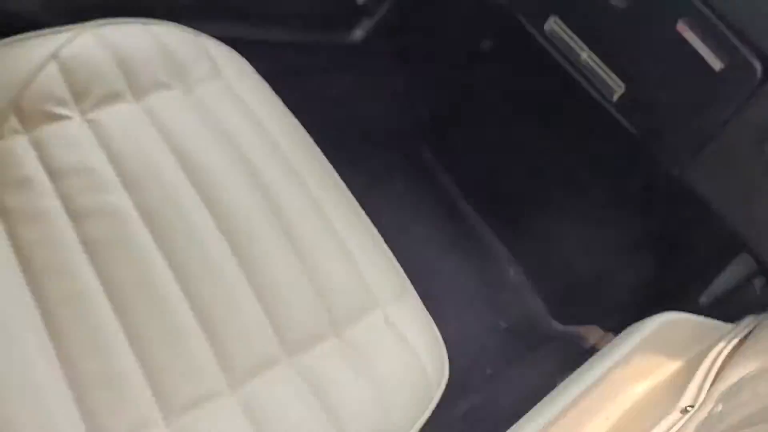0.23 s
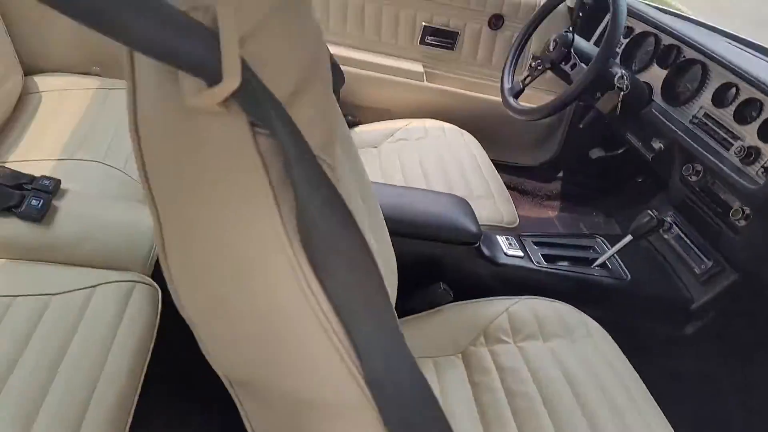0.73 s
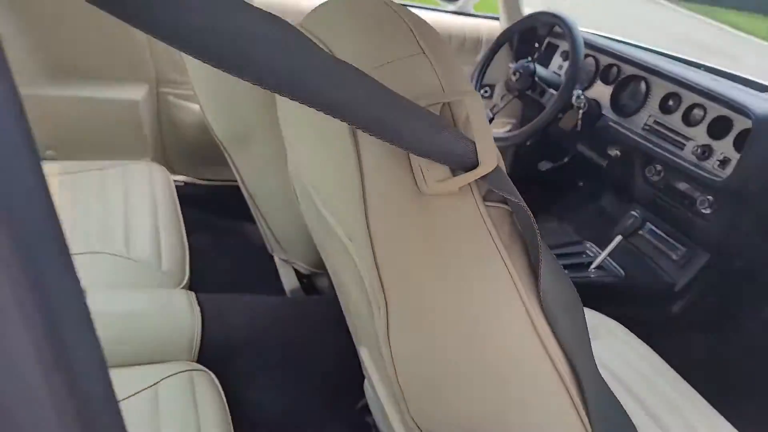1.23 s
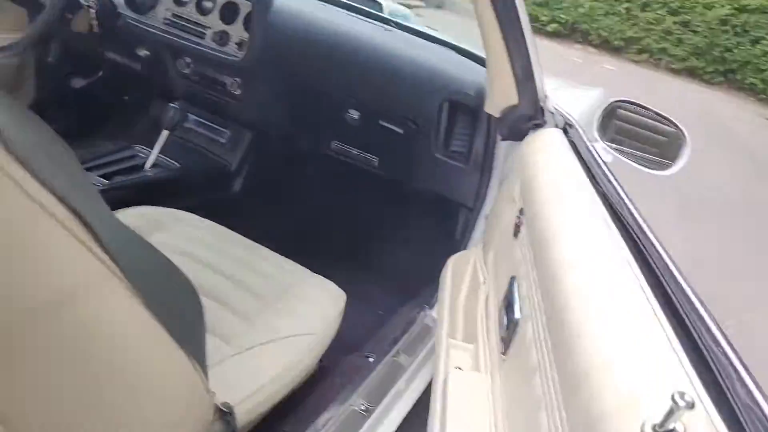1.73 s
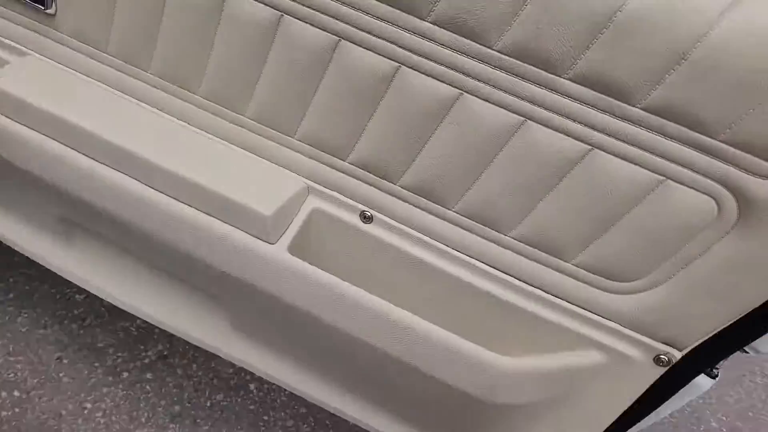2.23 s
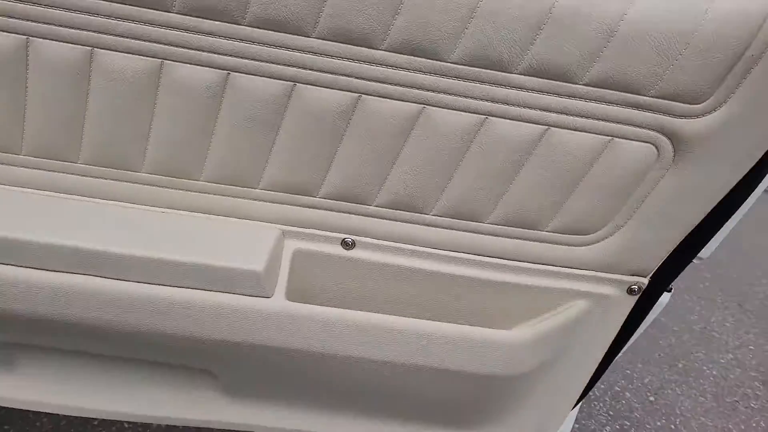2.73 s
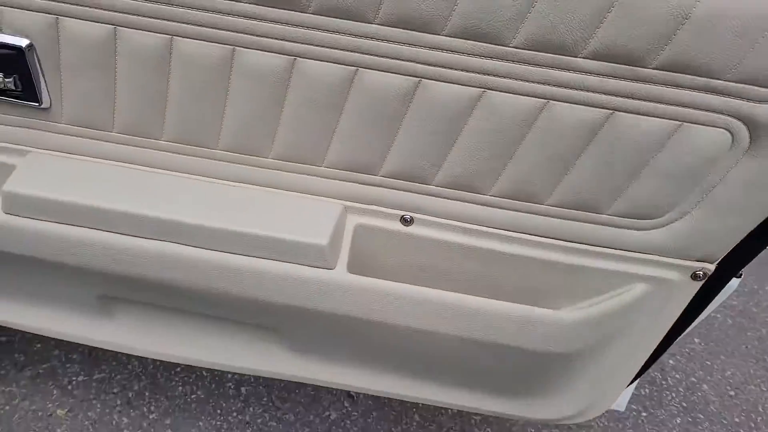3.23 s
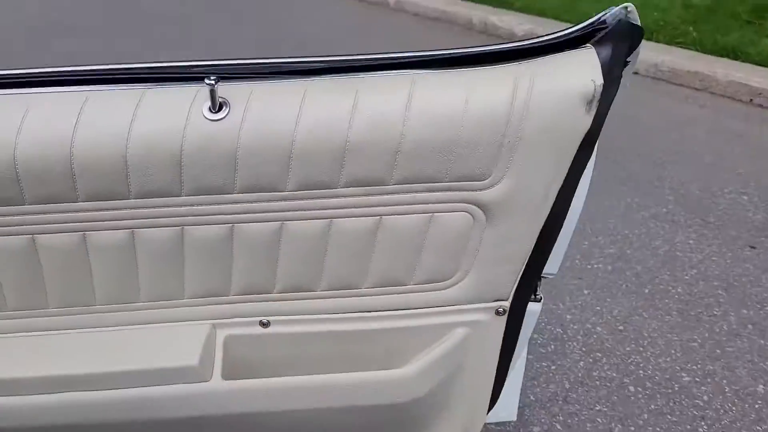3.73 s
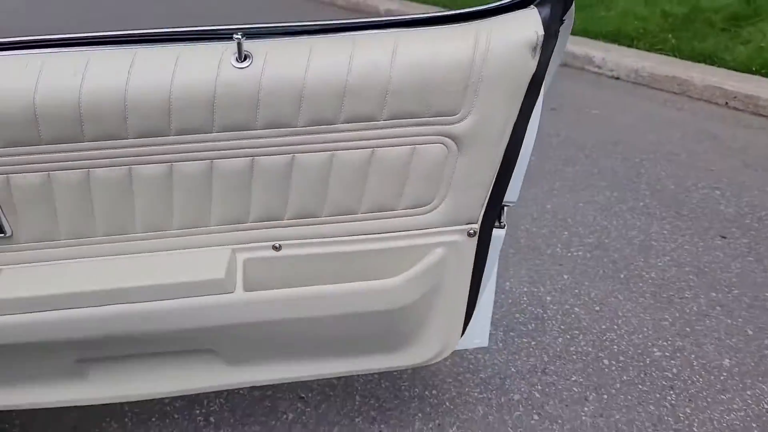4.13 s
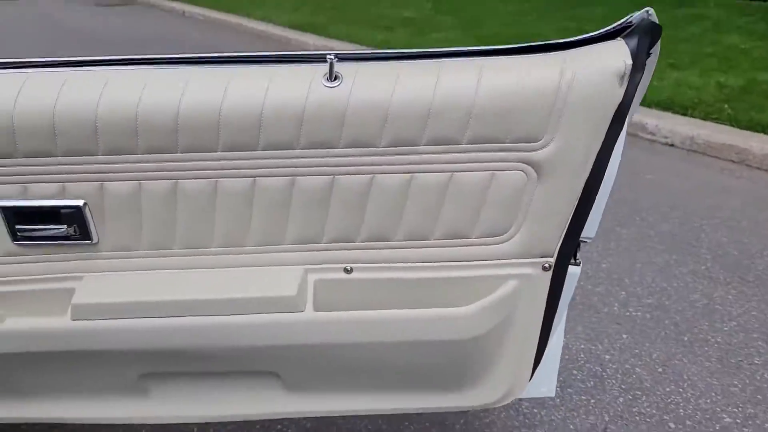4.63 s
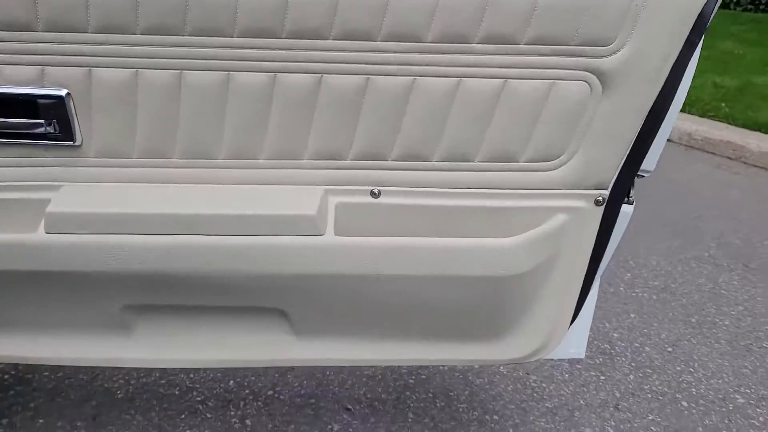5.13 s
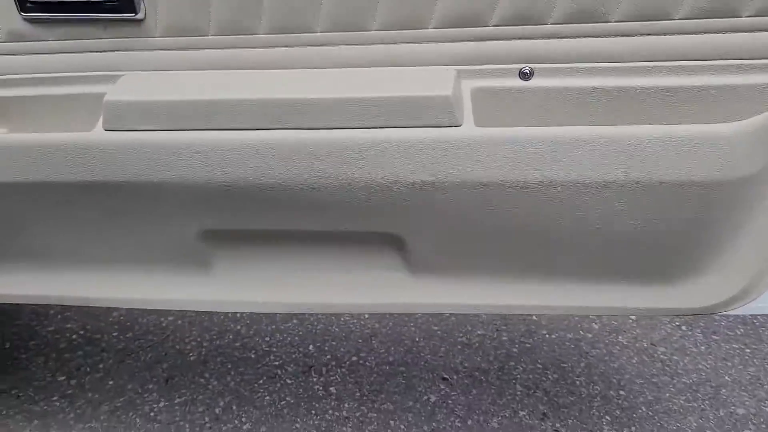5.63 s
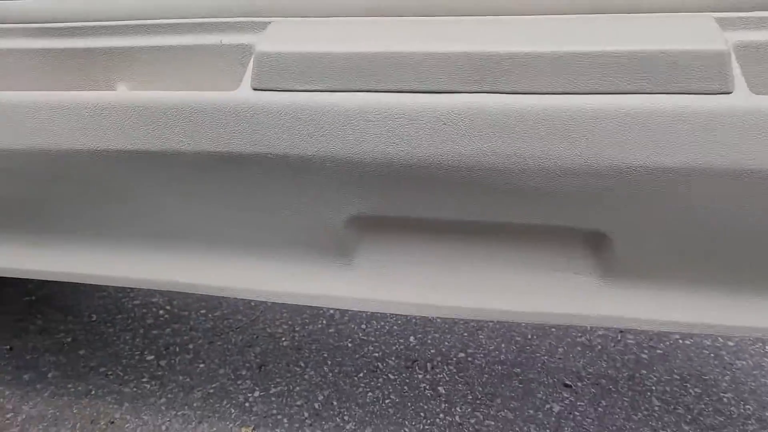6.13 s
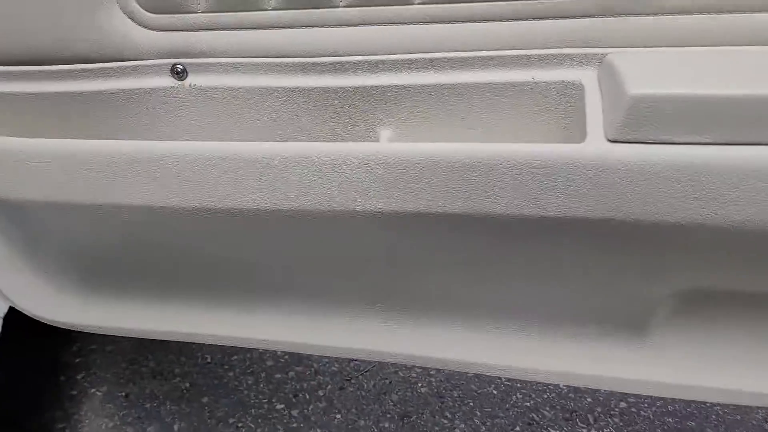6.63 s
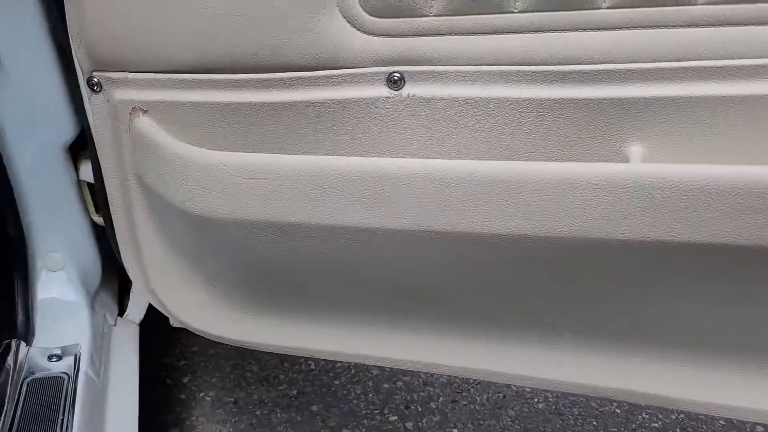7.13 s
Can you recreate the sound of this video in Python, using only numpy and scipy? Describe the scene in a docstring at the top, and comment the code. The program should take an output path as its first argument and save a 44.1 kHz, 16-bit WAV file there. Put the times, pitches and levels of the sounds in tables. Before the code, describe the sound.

Close handheld stereo outdoors beside an open car. Low puffs of air bump the microphones, mostly on the left, and a hard click snaps on the right. A seat latch rattles with short metallic rings and thuds, then a heavier padded thump follows. After a quiet gap, a shoe drags roughly over pavement, with more air and scuffing. The rest is sparse ticks and faint cloth rustle over soft distant traffic.

```python
"""Folding a car seat on a quiet road

Someone folds a car seat back and walks round the open door. The seat's ringing modes thud and its
latch rattles with short rings; shoes and cloth scuff as rough, shaped hiss; small things click.
Air buffets the microphones as low noise and single puffs, over the filtered noise of far traffic."""
import sys
import numpy as np
from scipy import signal
from scipy.io import wavfile
from scipy.ndimage import uniform_filter1d

SR = 44100
rng = np.random.default_rng(int(sys.argv[2]) if len(sys.argv) > 2 else 0)


def dump_mix(stems):
    """Bounce the given channels to the path in sys.argv[1] as a 16-bit WAV at rate SR."""
    frames = np.atleast_2d(stems).T  # one column per channel
    limited = np.clip(frames, -1, 1)  # hard clip at full scale
    pcm = np.round(limited * 32767).astype(np.int16)
    wavfile.write(sys.argv[1], SR, pcm)


N = 325017
STEP_S = 0.002  # time step for working out slow level changes
LAG_S = 0.00017  # shared sound reaches the left microphone this much later
EDGE_HZ = 15900  # upper limit of the sound

# Pan columns are left minus right. Colour tables give relative strength per Hz of bandwidth.
# Tone colour of the far traffic: pitch_hz, level_db
HUM_COLOUR = [(15, -36), (25, -7.5), (53, -2.5), (83, -18), (108, -14.5), (238, -11.5), (410, -15),
              (979, -21.5), (1470, -28), (2150, -32.5), (2900, -56.5), (3150, -47), (3510, -53),
              (11300, -56), (16500, -60)]
HUM_DB = -54.5
# Swelling and fading of the traffic, mostly in the lower pitches: time_s, change_db
TRAFFIC_SWELL = [(0, -5), (1, 5), (2.5, -4.5), (3.5, 3), (4.3, 0.5), (5.2, 4.5), (6, -2), (6.6, 0.6),
                 (7, -2.5), (7.37, -5.5)]
# Fuzzy bands in the hum: pitch_hz, width_hz, level_db
HUM_BANDS = [(129, 19.4, -58), (235, 8.1, -60), (279.7, 11.4, -66)]
# Faint thin bands that come and go: start_s, length_s, start_pitch_hz, end_pitch_hz, width_hz, level_db
THIN_BANDS = [(4.3, 0.2, 1965, 1930, 55, -70.5), (3.95, 0.85, 2050, 1850, 330, -72.5),
              (5.8, .125, 3250, 3250, 50, -77), (6.27, .2, 3235, 3220, 50, -73.5),
              (6.62, 0.66, 2150, 2135, 40, -74.5), (6.88, .2, 2200, 2130, 220, -71),
              (6.76, .27, 3220, 3145, 75, -73), (6.76, .17, 2700, 2700, 60, -81),
              (7.27, 0.11, 3210, 3200, 60, -78), (7.25, .11, 2690, 2680, 50, -81.5)]
# How alike left and right are in the hum; below 0 counts as 0: pitch_hz, likeness (no unit)
HUM_LIKENESS = [(60, 1), (180, 0.53), (550, 0.7737), (1650, -0.81), (4970, -0.04), (15000, -0.03)]

# Slow drift of the buffeting air: time_s, level_db, pan_db
WIND_DRIFT = [(0, -59, 10), (.2, -37, -8), (.44, -40, -13), (.6, -46, 9), (.92, -53.5, -28),
              (1.25, -47, -10), (1.5, -36, 4), (1.68, -41.5, -9), (1.9, -36, -12), (2.2, -46, -1),
              (2.681, -57, -11.5), (2.9, -48, -7), (3.15, -57, -3), (3.42, -48.5, 0), (3.9, -40, -8),
              (4.15, -55, 0), (4.75, -52.5, -2.5), (5.451, -51.5, -3), (6.05, -59, -1), (6.9, -56.5, -3),
              (7.37, -62, 0)]
# Tone colour of the buffeting air: pitch_hz, level_db
WIND_TONE = [(15, -46), (32, -13), (55, 9.5), (90, -6), (160, -11), (240, -16), (350, -21.5), (600, -57.5)]
# Gusts that swell and sink over the drift: peak_s, level_db, pan_db, length_s
WIND_GUSTS = [(0.18, -37.5, -4, 0.05), (0.285, -33, -18, 0.067), (.34, -36.5, -23, 0.087),
              (0.39, -34, -18, 0.053), (0.497, -26.5, 10, 0.041), (1.4, -31, -2, 0.1711),
              (1.561, -34, -24, 0.18), (1.75, -28, -21, 0.042), (2.082, -35, -2, 0.084),
              (2.322, -40, -16, 0.19), (2.5, -40, -21, 0.1552), (2.785, -46.5, 3, 0.1),
              (3.533, -39.5, 10, 0.049), (3.636, -35, -14, 0.07185), (3.803, -38, -13, 0.18),
              (4.03, -41.5, -2, 0.16), (4.634, -44, 5, 0.1289), (4.865, -48, 2.5, 0.087),
              (5.158, -48, 1, 0.088)]
GUST_DROP_DB = 11.5  # at both ends of its length a gust lies this far under its peak
# Puffs of air, most of them far stronger on one side:
# start_s, peak_db, pitch_hz, pan_db, length_cycles
AIR_PUFFS = [(.231, -25.5, 99.81, -25, 1.7), (0.259, -18.5, 73, -24, 1.3), (.268, -34, 226, -24, 4.9),
             (.316, -29, 276, -30, 6.6), (0.318, -23.5, 158, -36, 2.76), (0.326, -41.5, 459, -28, 11),
             (0.343, -17, 69, -39, 1.5), (0.496, -22.5, 56.7, 2, 1.5), (1.55, -13, 76.86, -29, 0.73),
             (1.732, -23, 92.17, -23.5, 1.1), (1.744, -28.5, 70.38, -18.5, 1.14),
             (2.295, -28, 69, -30, 2.2), (2.448, -27, 61.62, -19, 1.4), (3.52, -41, 70.14, 15, 3.4),
             (3.627, -28, 131, -27.5, 5.4), (3.714, -24, 255, -13, 0.98), (3.721, -20, 246, -11.5, 1.13),
             (3.74, -25.5, 85.9, -26.5, 1.3575), (3.798, -21.5, 99.92, -23.5, 1.7),
             (3.975, -28, 60.42, -24, 2.5)]

# Faint rustle of cloth under everything: time_s, level_db
CLOTH_RUSTLE = [(0, -60), (.32, -65), (.45, -63.5), (.78, -65), (1.07, -58.5), (1.54, -64.5), (1.7, -61.5),
                (2.25, -61), (2.55, -71.5), (2.86, -66), (3.2, -71), (3.58, -63), (3.93, -52.5),
                (4.21, -65.5), (4.68, -77.5), (5., -63.5), (5.4, -60), (5.75, -67.5), (6.2, -66.5),
                (6.55, -62.5), (6.72, -70.5), (7.37, -78)]
RUSTLE_FINE_DB, RUSTLE_PAN_DB = 0.5, 0.5
# Strokes of shoes, cloth and vinyl, timed at full level:
# full_s, swell_s, hold_s, level_db, fineness_db (treble tilt per two octaves), pan_db
RUB_STROKES = [(0.222, 0.20526, 0.028, -51, -8, -2), (0.542, 0.0063, 0.026, -46, 0.5, 9),
               (0.607, 0.038, 0.044, -44.5, -3, -1.5), (0.687, .05, .006, -45, -7, -2),
               (.72, .008, .016, -42.5, 3, -9), (0.855, 0.0408, 0.0963, -61, -7, -9),
               (1.191, 0.11, .008, -46, -4, 1.5), (1.41, .02, 0.12, -54, -8, 1),
               (1.594, .02, 0.021, -51.5, 4, 2), (1.931, 0.014, 0.21, -48, -4.5, 2),
               (3.753, 0.12, 0.058, -39.5, -3, 0.5), (3.822, 0.0095, 0.03, -36.5, 3.5, 10.5),
               (3.989, 0.032, 0.023, -51, 4, 12), (4.162, 0.016, 0.023, -59, 3.5, 14),
               (4.866, 0.11, 0.042, -51, 4, 0), (5.09, 0.016, .005, -47, -1, -1),
               (5.166, .02, .015, -55, 8, 4), (5.305, 0.067, 0.1, -60.5, 2.5, 1),
               (5.63, .03, .005, -59, -9.5, -2), (5.772, .05, .005, -60, -14, -0.5),
               (5.974, 0.13, 0.05, -53.5, 2, 0), (6.33, 0.12, 0.19, -64, -9, -0.5),
               (6.635, .03, 0.018, -66, 1, -0.5)]
SWELL_DB, LIFT_DB_PER_S = 20.5, 497  # climb during the swell, speed of dying when a stroke lifts off
# Tone colour of rubbing and scraping: pitch_hz, level_db
RUB_TONE = [(290, -34), (500, -0.5), (651, 0.5), (980, 0), (1570, 2), (2160, 2), (5590, 2.5), (9330, -5),
            (12700, 0), (15800, -5), (16500, -42)]
# How alike left and right are in friction hiss: pitch_hz, likeness (no unit)
RUB_LIKENESS = [(60, 0.54), (240, 0.9737), (950, 0.52), (3770, 0.045), (15000, 0.01)]
# One long drag of a shoe over the road:
# time_s, level_db, fineness_db (treble tilt per two octaves), pan_db
SHOE_DRAG = [(3.27, -68, -8, 2), (3.314, -32, 3, 1), (3.366, -37, 3.5, 2.5), (3.4, -33, 6, 1),
             (3.492, -31.5, 5.5, 0), (3.508, -46, 8, 1.5), (3.545, -56, -10, -0.5)]
# Tone colour of that drag: pitch_hz, level_db
DRAG_TONE = [(290, -54), (500, -8.5), (859, -9.5), (1200, 0.5), (1370, -14), (1570, 1), (1980, -10.5),
             (2220, -3.5), (2540, -6), (3820, -0.5), (7710, -13.5), (9190, -17.5), (15100, -17),
             (15800, -25), (16500, -36)]

# Dry clicks: start_s, peak_db, pitch_hz, pan_db, fall_s (time to fall 60 dB)
DRY_CLICKS = [(.206, -41.5, 950, -5.5, 0.035), (.4845, -34.5, 4000, 5, 0.003966),
              (.5105, -24, 3200, 2, 0.00304), (.528, -29, 1250, -1.5, 0.01472),
              (.4885, -12, 4400, 27.5, 0.002662), (.4907, -2.5, 1400, 39, 0.0025),
              (.5332, -13, 7384, 32, 0.0015), (.5415, -14, 1340, -4, 0.0076),
              (.5465, -21.5, 1929, 14, 0.00274), (.597, -34, 6500, 0, .002), (.655, -38, 3500, 0, .003),
              (.514, -31, 1141, -5, 0.039), (1.2665, -25, 5030, 5.5, 0.00541),
              (1.274, -17, 5020, 5.5, 0.017), (1.282, -21, 4260, 9, 0.013), (1.291, -17, 2200, 6, 0.0065),
              (1.3605, -13, 4510, 14, 0.012), (1.366, -23, 5200, 6.5, .008), (1.3865, -29, 5470, 0, .005),
              (1.3265, -22, 4470, 3, 0.013), (1.349, -7.5, 1680, 5, 0.008),
              (1.577, -21.5, 3020, 11.5, 0.0022), (3.686, -31, 1490, -8, 0.00705),
              (2.519, -33, 1320, 2, 0.0038), (2.098, -38, 2640, -13, 0.0109), (2.77, -46, 6019, 0, .003),
              (2.91, -48, 5940, 0, 0.0025), (3.0125, -34, 3200, 7, .004), (3.069, -38, 740, -2, 0.00953),
              (3.189, -39.5, 12000, 0, 0.0007), (3.197, -46, 4500, 0, 0.0027),
              (3.241, -31.5, 1045, -1, 0.0065), (3.627, -38, 5605, -14, 0.0032),
              (3.735, -21.5, 2552, 1, 0.0023), (3.915, -35, 1480, -1.5, 0.0034),
              (4.087, -30, 2500, 5, 0.003), (4.215, -27.5, 1774, -1, 0.0011),
              (4.232, -34, 6340, 2.5, 0.00083), (4.286, -43.5, 5393, -2, 0.003965),
              (4.499, -46.5, 4850, 0, 0.0024), (4.834, -47, 5500, 6.5, .003), (4.842, -30, 3870, 19, 0.003),
              (4.8425, -27, 480, 3, 0.0088), (4.907, -36, 1600, -3, 0.0071),
              (4.936, -34.5, 600, -4, 0.0055), (5.153, -42, 4298, 0.5, 0.0035),
              (5.259, -39.5, 1710, 0, 0.0084), (5.293, -38, 6798, -0.5, 0.002),
              (5.333, -33, 4496, -0.5, 0.0014), (5.628, -40, 3600, 17, 0.00433),
              (5.757, -52, 1890, -10, 0.067), (5.775, -53.5, 2603, -5, 0.0177),
              (5.79, -57.5, 3701, 8, 0.02004), (7.007, -42.5, 5550, -3, 0.00084),
              (7.19, -54, 6000, 3.5, 0.0017)]
# One tight tick with neither bass nor top: start_s, peak_db before its filter, pitch_hz, pan_db, fall_s (60 dB)
TIGHT_TICK = (6.0265, -16, 3040, 40, 0.0034)
# The band that the tight tick keeps: low_hz, high_hz
TICK_BAND = (1250, 5700)
# Short scrapes with a sharp start: start_s, level_db, fineness_db (treble tilt per octave), pan_db,
# hold_s, fall_s (time to fall 45 dB in the deep bass; treble falls faster)
SHORT_SCRAPES = [(.485, -37.5, -25, 19.5, 0.00508, 0.0507), (.510, -35, -0.5, 3, 0.03, 0.078),
                 (1.083, -45.5, -6.5, 3, 0.00499, 0.14), (1.153, -47, 0, -0.5, .015, 0.074),
                 (1.19, -48, 1, -2, 0.0055, 0.063), (1.251, -32.5, -3.5, 1, 0.015, 0.0671),
                 (1.266, -24, -0.3, 2, 0.027, 0.07), (1.325, -31, -4.5, 4.5, 0.005, 0.055),
                 (1.348, -19.5, -5, 2, 0.014, 0.145), (1.362, -22.5, -3.5, 3, 0.0031, 0.05663),
                 (1.386, -33.5, -4, -4.5, 0.0036, 0.04), (1.459, -41, -6.5, 2, 0.0068, 0.13),
                 (1.521, -43, -14, -1, 0.004, 0.06), (1.577, -41, -0.5, 1, 0.002, 0.088),
                 (1.840, -26, 0.5, -1, 0.03322, 0.04651), (1.873, -24.5, -3, 4.5, 0.024, 0.13),
                 (1.887, -24.5, -4, -3, 0.004, 0.12), (2.521, -53, 2, 0, 0.02603, 0.12),
                 (3.686, -44.5, -2, 2, 0.005, 0.054), (4.050, -47, -4, -1, 0.0076, 0.19),
                 (4.843, -47.5, 0.5, -12, 0.004785, 0.059), (5.091, -42.5, 3.5, 2, 0.00903, 0.25),
                 (5.140, -36.5, 3, -0.5, 0.044, 0.11), (5.999, -53, -5, -12.5, 0.0063, 0.0481)]
# Blows on the seat frame: start_s, level_db, centre_hz, narrowness_db (per octave squared),
# contact_s (push falls to 1/e), damping (a factor on how fast the ringing dies)
SEAT_BLOWS = [(1.082, -33.5, 126, 4.5, 0.0091, 0.92), (1.266, -21.5, 365, 22, 0.015, 2.2),
              (1.281, -20, 353, 14, 0.0035, 2.6), (1.291, -33, 190, 0, .004, 1.1),
              (1.348, -27.5, 601, -0.5, 0.0044, 3.), (1.356, -19.5, 219, 3, 0.0052, 1.5),
              (1.378, -30.5, 262, 7.5, .004, 0.75), (1.845, -38.5, 435.7, 7, 0.025, 1),
              (1.893, -15, 222, 2.5, 0.0023, 1.07), (1.914, -28.5, 690, 7, 0.0049, 1.38),
              (2.105, -41, 200, 4, 0.0089, 1.6)]
# Ringing modes of the seat: pitch_hz, level_db, fall_s (time to fall 60 dB at damping 1)
SEAT_MODES = [(114.8, -3.5, 0.53), (155.7, -8.5, 0.46), (196, -6.5, 0.29), (241.8, -6, 0.37),
              (264.7, -9, 0.28), (308, -9, 0.39), (348, -8, 0.22), (402, -15, 0.18), (530, -11, 0.16),
              (562, -13.5, 0.26), (678, -17, 0.15), (733, -17, 0.23), (915, -14, 0.15), (980, -22, 0.26),
              (1130, -19, 0.21), (1310, -31, 0.17), (1440, -31, 0.16)]


def amp(db):
    """Turn decibels into a plain gain."""
    return 10 ** (np.asarray(db) / 20)


def evened(x):
    """Scale a sound to an average (RMS) strength of one."""
    return x / np.sqrt(np.mean(x ** 2) + 1e-20)


def read(points, hz):
    """Read a curve between its points, with pitch on a log scale."""
    f, value = np.transpose(points)
    return np.interp(np.log(hz + 1), np.log(f + 1), value)


def sides(pan_db):
    """Left and right gains whose mean is one."""
    ratio = amp(pan_db)
    return np.array([2 * ratio / (1 + ratio), 2 / (1 + ratio)])


def add(mix, start_s, sound):
    """Lay a sound into the mix, cut off where the mix ends."""
    part = mix[:, round(start_s * SR):][:, :sound.shape[1]]
    part += sound[:, :part.shape[1]]


def blend(levels_db, values):
    """Total level of several sounds at once, and their values weighted by power."""
    power = amp(levels_db) ** 2
    total = power.sum(axis=0)
    return 10 * np.log10(total), [(power * v).sum(axis=0) / total for v in values]


def near_lead(hz):
    """Phase shift that makes the left side late by LAG_S."""
    return -2 * np.pi * hz * LAG_S


def noise(field_db, same, lead, patchy_db, size, length=N):
    """Stereo noise from random short spectra, shaped by field_db(hz, t) and by drifting patches."""
    hop = size // 4
    frames = length // hop + 5
    hz = np.fft.rfftfreq(size, 1 / SR)[:, None]
    a, b, c, d, patches = rng.standard_normal((frames, len(hz), 5)).T
    patches = uniform_filter1d(patches, size=8, axis=0)
    patches = evened(uniform_filter1d(patches, size=10, axis=1))
    like = np.clip(same(hz), 0, 1)
    left = a + 1j * b
    # the right side shares part of the left and adds noise of its own
    right = like * left * np.exp(-1j * lead(hz)) + np.sqrt(1 - like ** 2) * (c + 1j * d)
    level_db = field_db(hz, np.arange(frames) * hop / SR) + patchy_db * patches
    spectra = np.array([left, right]) * amp(level_db)
    return signal.istft(spectra, nperseg=size, noverlap=size - hop)[1][:, :length]


def band(x, hz, width):
    """A resonance of gain one at its centre."""
    return signal.lfilter(*signal.iirpeak(hz, hz / width, SR), x)


def thin_band(length_s, start_hz, end_hz, width, db):
    """Slow random noise turned up to a gliding, slightly wavering pitch."""
    count = round(length_s * SR)
    waver = 1 + 0.002 * evened(uniform_filter1d(rng.standard_normal(count), size=2500))
    pitch = np.linspace(start_hz, end_hz, count) * waver
    pole = np.exp(-np.pi * width / SR)
    fuzz = signal.lfilter([1], [1, -pole], rng.standard_normal((2, 2, count)))
    thin = ((fuzz[0] + 1j * fuzz[1]) * np.exp(2j * np.pi * np.cumsum(pitch) / SR)).real
    tone = evened(band(thin, (start_hz + end_hz) / 2, 1.5 * width))
    return amp(db) * tone * signal.windows.tukey(count, .4)


def hum():
    """Far traffic: dull noise that swells under a steady hiss, with fuzzy low and thin high bands."""
    def field(hz, t):
        swell_db = np.interp(t, *np.transpose(TRAFFIC_SWELL))
        return read(HUM_COLOUR, hz) + swell_db / (1 + (hz / 2400) ** 4)

    out = amp(HUM_DB) * evened(noise(field, lambda hz: read(HUM_LIKENESS, hz), near_lead, 2.8, size=1024))
    for hz, width, db in HUM_BANDS:
        out += amp(db) * evened(band(rng.standard_normal(N), hz, width))
    for start_s, *row in THIN_BANDS:
        add(out, start_s, thin_band(*row))
    return out


def puff(db, hz, pan_db, cycles):
    """A puff of air: a few cycles of a low tone that swell and fade."""
    t = np.arange(round(cycles / hz * SR)) / SR
    return amp(db) * sides(pan_db)[:, None] * np.sin(2 * np.pi * hz * t) * np.hanning(len(t))


def wind():
    """Buffeting air: lumpy low noise, partly alike at the two microphones, and single puffs."""
    t = np.arange(0, N / SR + STEP_S, STEP_S)
    s, db, pan_db = np.transpose(WIND_DRIFT)
    peak, gust_db, gust_pan_db, length = np.transpose(WIND_GUSTS)[:, :, None]
    gusts_db = gust_db - GUST_DROP_DB * abs(2 * (t - peak) / length) ** 2.16
    levels_db = np.vstack([np.interp(t, s, db), gusts_db])
    pans_db = np.vstack([np.interp(t, s, pan_db), gust_pan_db + 0 * t])
    level_db, (side_db,) = blend(levels_db, [pans_db])

    field = lambda hz, t: read(WIND_TONE, hz) + 0 * t
    air = evened(noise(field, lambda hz: 0.69 + 0 * hz, near_lead, 1.0, size=2048))
    now = np.arange(N) / SR
    out = air * amp(np.interp(now, t, level_db)) * sides(np.interp(now, t, side_db))
    for start_s, *row in AIR_PUFFS:
        add(out, start_s, puff(*row))
    return out


def slips(length, per_s, depth):
    """Tiny stick-slips that roughen a friction hiss: random kicks that die quickly."""
    size = amp(1.9 * np.minimum(rng.exponential(1, length), 3))
    kicks = size * (rng.random(length) < per_s / SR)
    return evened(1 + depth * signal.lfilter([1], [1, -.97], kicks))


def strokes():
    """Course of the rubbing: every stroke swells, holds and lifts off over the rustle."""
    t = np.arange(0, N / SR + STEP_S, STEP_S)
    s, swell, hold, db, fine_db, pan_db = np.transpose(RUB_STROKES)[:, :, None]
    rise_db = SWELL_DB * np.maximum(s - t, 0) / swell
    lift_db = LIFT_DB_PER_S * np.maximum(t - s - hold, 0)
    levels_db = np.vstack([np.interp(t, *np.transpose(CLOTH_RUSTLE)), db - rise_db - lift_db])
    fines_db = np.vstack([RUSTLE_FINE_DB, fine_db])
    pans_db = np.vstack([RUSTLE_PAN_DB, pan_db])
    level_db, rest = blend(levels_db, [fines_db, pans_db])
    return np.transpose([t, level_db, *rest])


def rub(rows, colour, grain, size):
    """Friction hiss roughened by stick-slips; finer rubbing tilts it to the treble."""
    s, db, fine_db, pan_db = np.transpose(rows)

    def field(hz, t):
        return read(colour, hz) + np.interp(t, s, fine_db) * np.log2((hz + 300) / 4000) / 2

    hiss = evened(noise(field, lambda hz: read(RUB_LIKENESS, hz), near_lead, 1.9, size=size))
    t = np.arange(N) / SR
    level = amp(np.interp(t, s, db, left=-np.inf, right=-np.inf))  # silent outside the rows
    return hiss * slips(N, 220, grain) * level * sides(np.interp(t, s, pan_db))


def click(db, hz, pan_db, fall_s):
    """A quick ring with a sharp tick and little bass, and a faint scatter off the car behind it."""
    t = np.arange(3000) / SR
    ring = np.sin(2 * np.pi * hz * t) * amp(-60 * t / fall_s)
    tick = 0.21 * rng.standard_normal(len(t)) * amp(-150 * t / fall_s)
    scatter = band(rng.standard_normal((2, len(t))), hz, 0.69 * hz)
    scatter = scatter * amp(-16 - 60 * t / 0.081) * np.minimum(t / 0.00051, 1)
    direct = np.array([np.roll(ring + tick, round(LAG_S * SR)), ring + tick])
    sound = amp(db) * (sides(pan_db)[:, None] * direct + scatter)
    return signal.sosfilt(signal.butter(2, 0.26485 * hz, "highpass", fs=SR, output="sos"), sound)


def tight_tick(*row):
    """A click kept to one band, without bass or top."""
    tight = signal.butter(3, TICK_BAND, "bandpass", fs=SR, output="sos")
    return signal.sosfilt(tight, click(*row))


def scrape(db, fine_db, pan_db, hold_s, fall_s):
    """A clattering burst of friction that starts at once, holds and dies; its treble dies first."""
    t = np.arange(8000) / SR

    def field(f, u):
        tilt_db = fine_db * np.log2((f + 300) / 3500)
        return read(RUB_TONE, f) + tilt_db - 25 * u / fall_s * np.log2(1 + f / 4000)

    grit = noise(field, lambda f: read(RUB_LIKENESS, f), near_lead, 2.93, size=128, length=len(t))
    grit = grit / np.sqrt(np.mean(grit[:, :600] ** 2)) * slips(len(t), 400, 0.9)
    start = np.minimum(t / 0.00063, 1)
    end = np.minimum((t[-1] - t) / .05, 1)
    fall = amp(-45 * np.maximum(t - hold_s, 0) / fall_s)
    return amp(db) * sides(pan_db)[:, None] * grit * start * end * fall


def thud(db, hz, narrow_db, contact_s, damping):
    """An uneven push rings the modes of the seat, weighted by how near they lie to a centre pitch."""
    t = np.arange(16000) / SR
    u = t[:round(.06 * SR)]
    push = (rng.standard_normal(len(u)) + 40 * (u == 0)) * np.exp(-u / contact_s)
    body = np.zeros(len(t))
    for f, level, fall_s in SEAT_MODES:
        mode_db = level - narrow_db * np.log2(f / hz) ** 2 - 60 * damping * t / fall_s
        body += amp(mode_db) * np.sin(2 * np.pi * f * t)
    knock = signal.fftconvolve(push, body)[:len(t)]

    # the cabin fills the gaps between the modes with a dull wash
    def field(f, u):
        near_db = -1.3 * narrow_db * np.log2((f + 20) / hz) ** 2
        bass_cut_db = 30 / (1 + (f / 90) ** 4)
        return near_db - bass_cut_db - 45 * damping * u / 0.36 * (1 + f / 500)

    wash = noise(field, lambda f: .97 - f / 2000, near_lead, 3.3, size=512, length=len(t))
    strength = lambda x: np.sqrt(np.mean(x[..., :1800] ** 2))
    sound = knock / strength(knock) * sides(-1.4)[:, None] + 0.6 * wash / strength(wash)
    start = np.minimum(t / 0.0021, 1)  # the padding softens the start
    return amp(db) * sound * start * np.minimum((t[-1] - t) / .05, 1)


def scene():
    """Traffic and air first, then rubbing, then the clicks, scrapes and thuds."""
    mix = hum() + wind()
    mix += rub(strokes(), RUB_TONE, grain=0.48, size=256)
    mix += rub(SHOE_DRAG, DRAG_TONE, grain=0.55, size=512)
    for rows, source in ((DRY_CLICKS, click), ([TIGHT_TICK], tight_tick),
                         (SHORT_SCRAPES, scrape), (SEAT_BLOWS, thud)):
        for start_s, *row in rows:
            add(mix, start_s, source(*row))
    return mix


def record(dry):
    """Bass roll-off of the microphones, then the band limit."""
    thin = signal.sosfilt(signal.butter(2, 35, "highpass", fs=SR, output="sos"), dry)
    limit = signal.firwin(511, EDGE_HZ, window=("kaiser", 9), fs=SR)
    return signal.oaconvolve(thin, limit[None], "same")


dry = scene()
out = record(dry)
dump_mix(out)
```